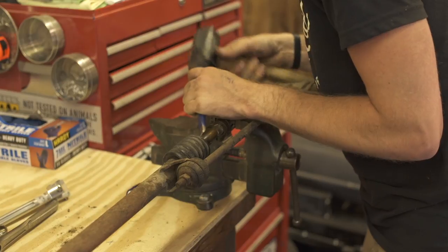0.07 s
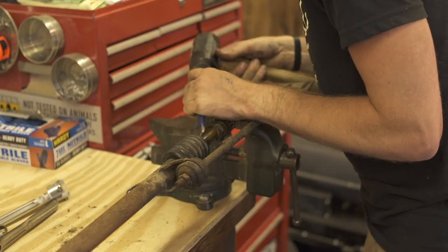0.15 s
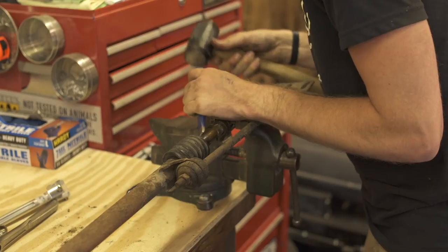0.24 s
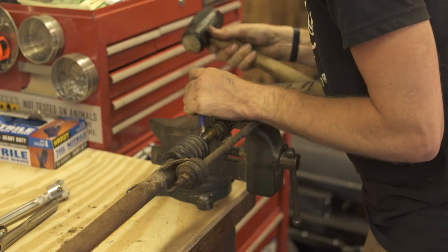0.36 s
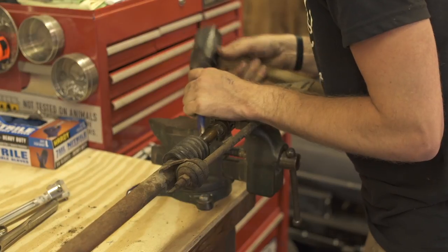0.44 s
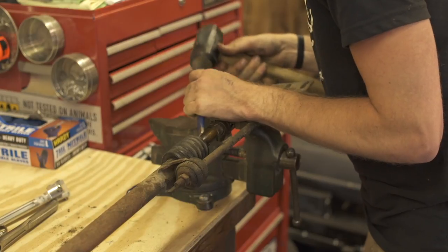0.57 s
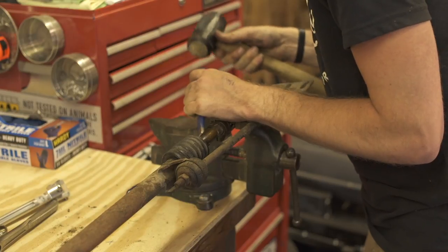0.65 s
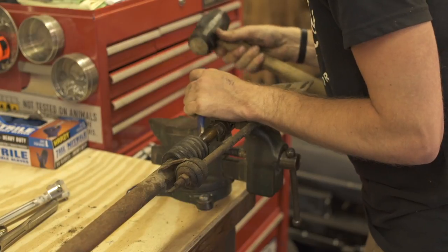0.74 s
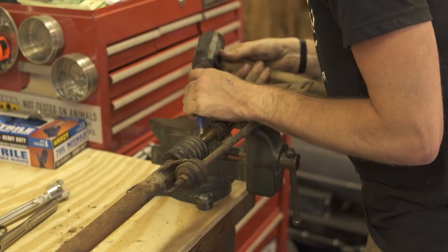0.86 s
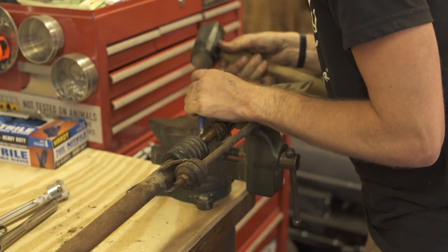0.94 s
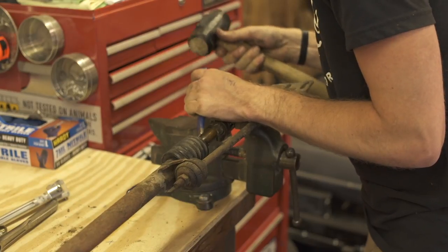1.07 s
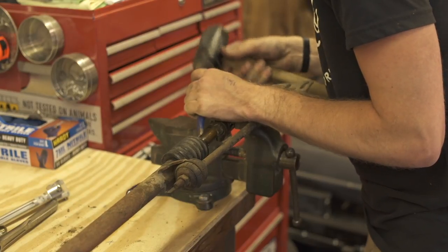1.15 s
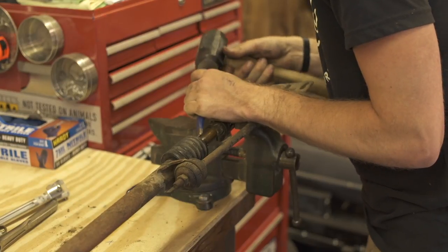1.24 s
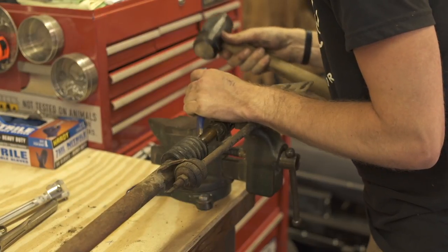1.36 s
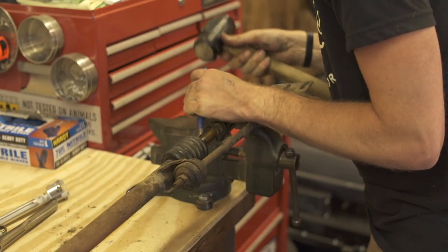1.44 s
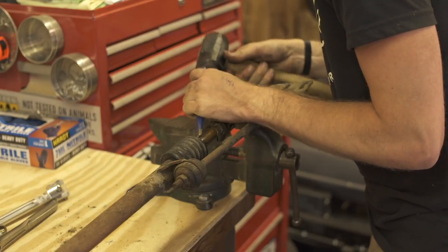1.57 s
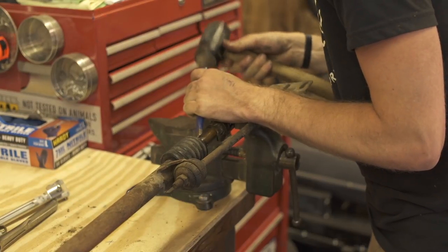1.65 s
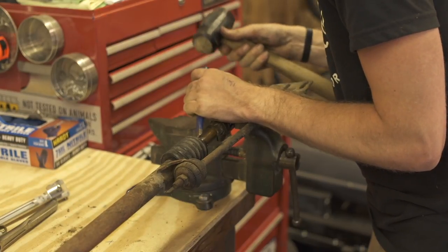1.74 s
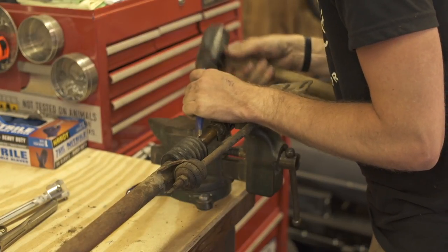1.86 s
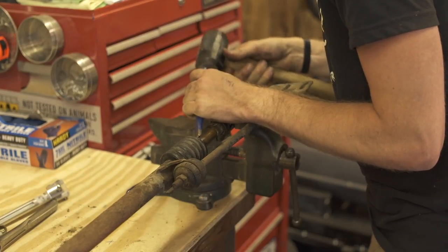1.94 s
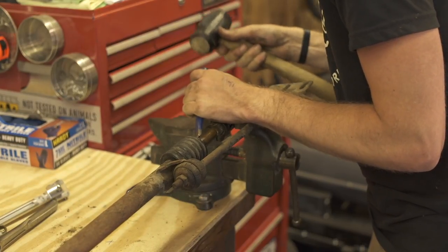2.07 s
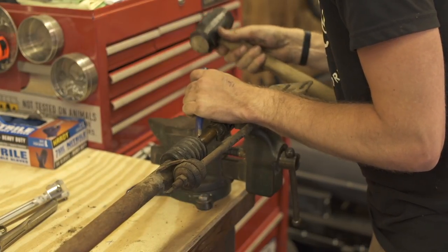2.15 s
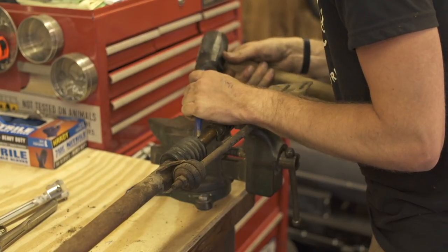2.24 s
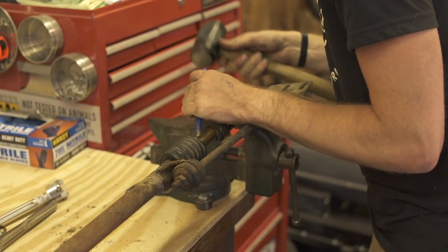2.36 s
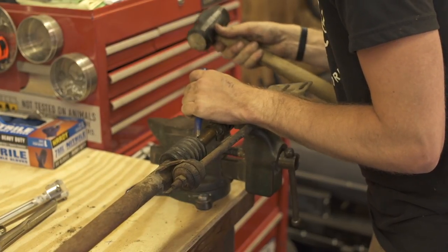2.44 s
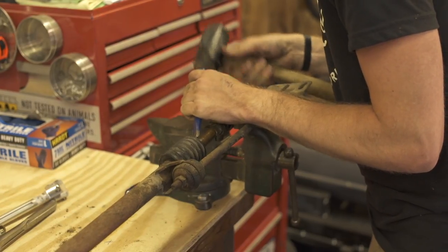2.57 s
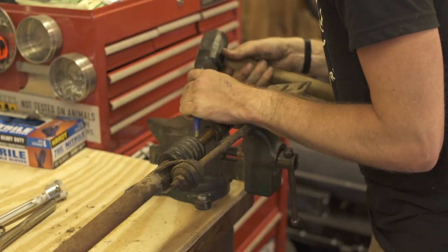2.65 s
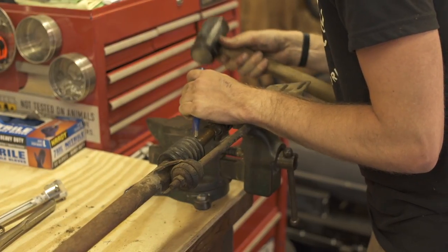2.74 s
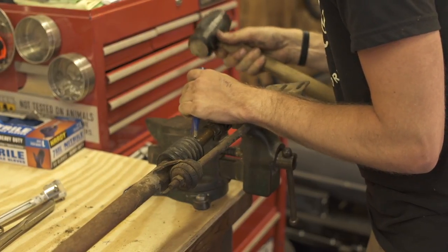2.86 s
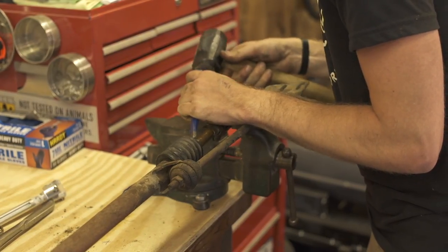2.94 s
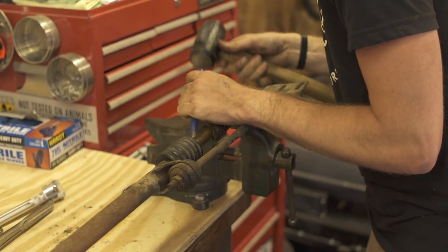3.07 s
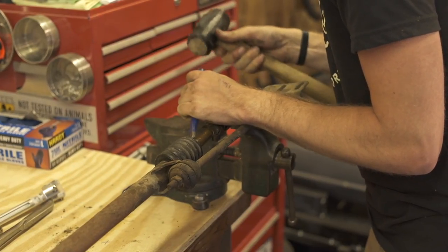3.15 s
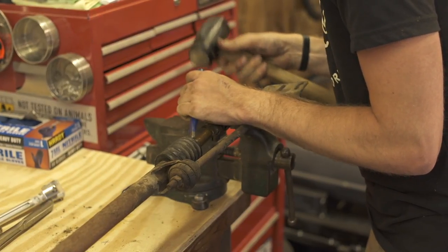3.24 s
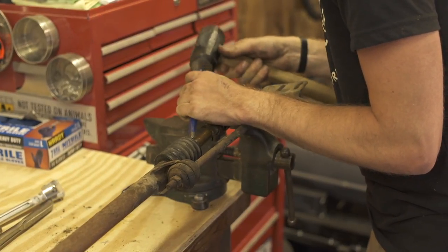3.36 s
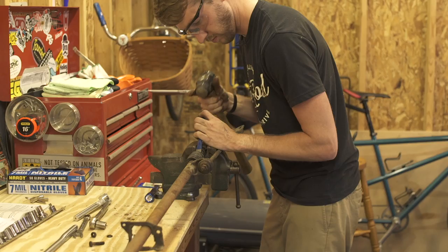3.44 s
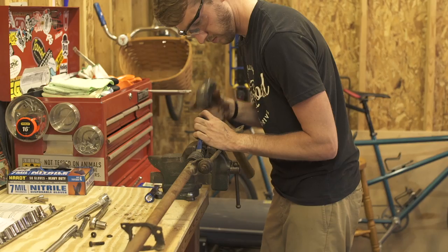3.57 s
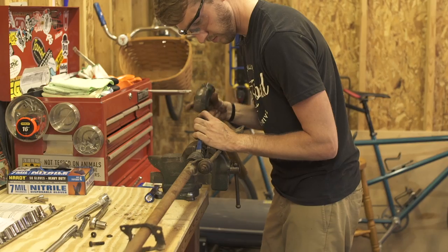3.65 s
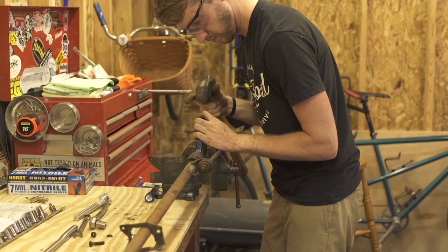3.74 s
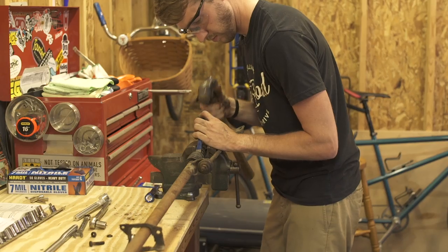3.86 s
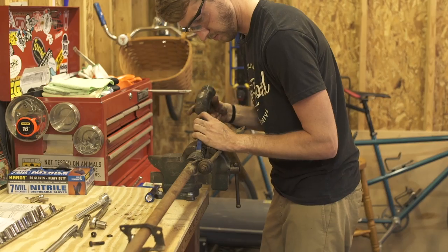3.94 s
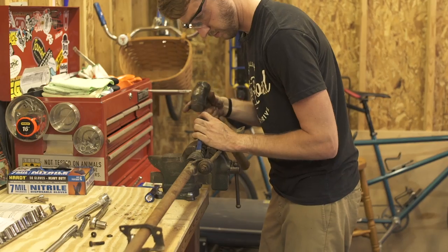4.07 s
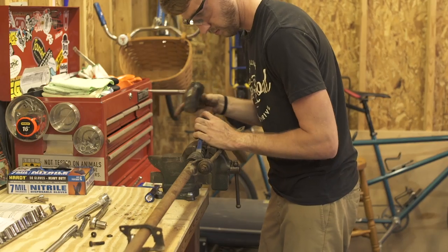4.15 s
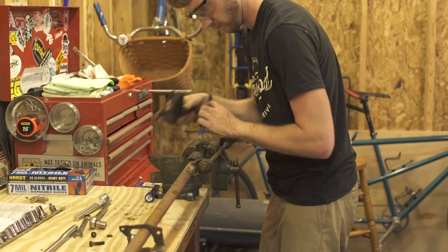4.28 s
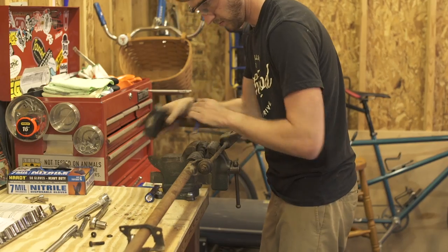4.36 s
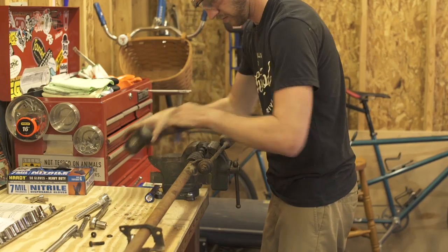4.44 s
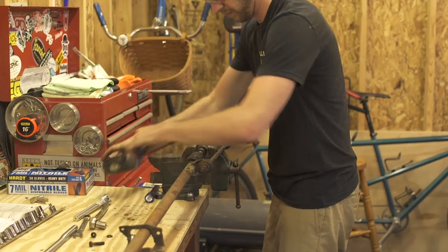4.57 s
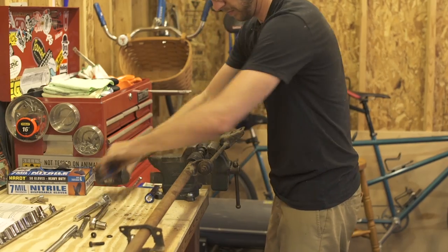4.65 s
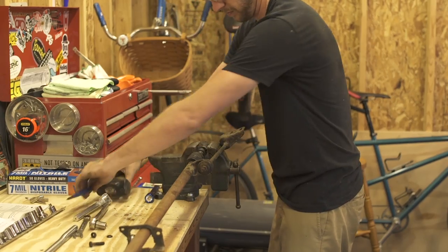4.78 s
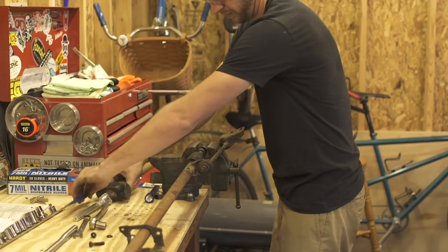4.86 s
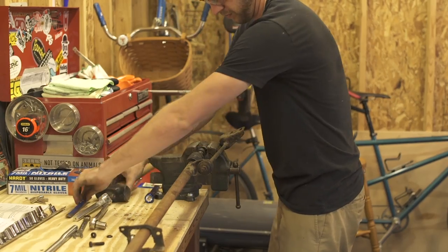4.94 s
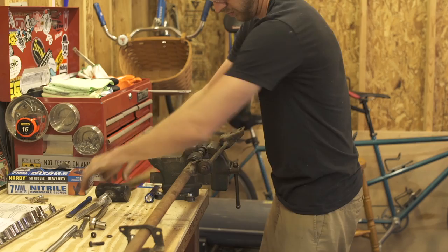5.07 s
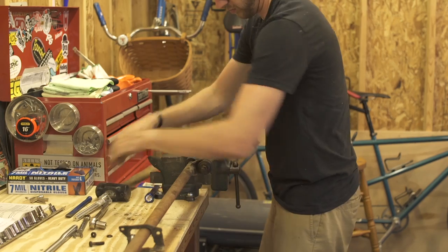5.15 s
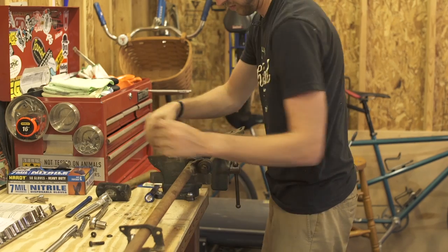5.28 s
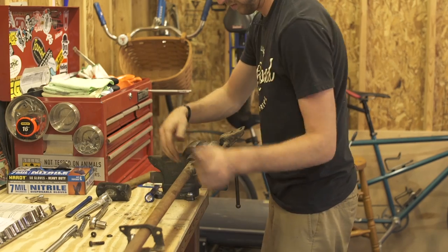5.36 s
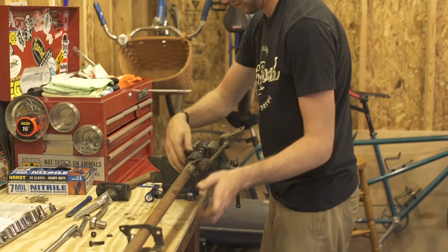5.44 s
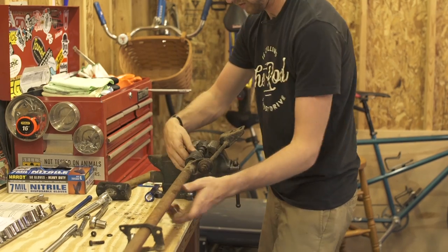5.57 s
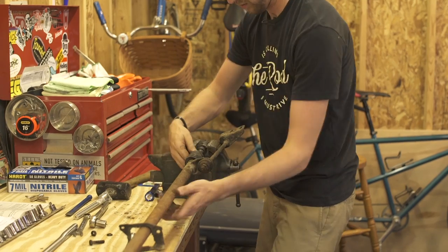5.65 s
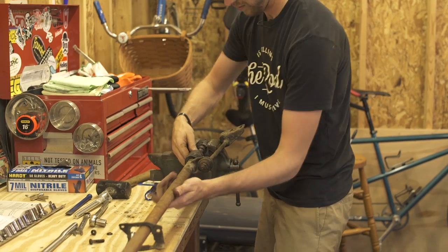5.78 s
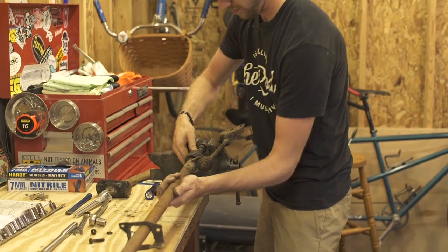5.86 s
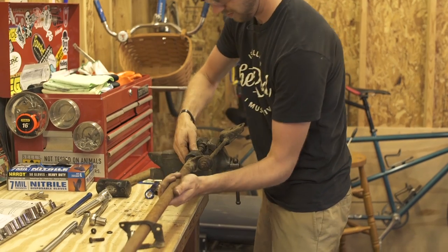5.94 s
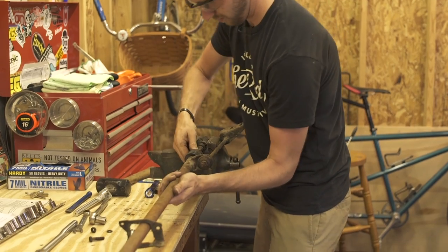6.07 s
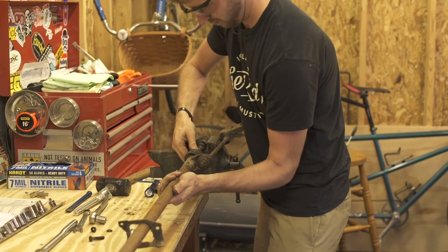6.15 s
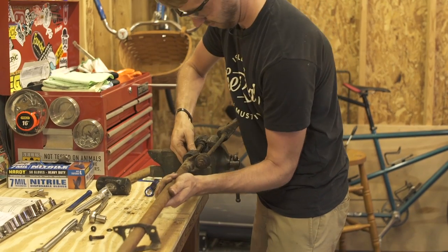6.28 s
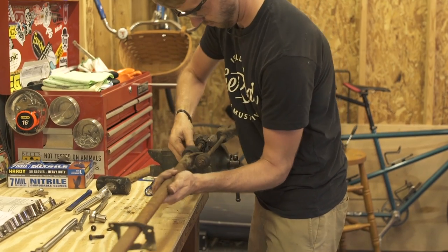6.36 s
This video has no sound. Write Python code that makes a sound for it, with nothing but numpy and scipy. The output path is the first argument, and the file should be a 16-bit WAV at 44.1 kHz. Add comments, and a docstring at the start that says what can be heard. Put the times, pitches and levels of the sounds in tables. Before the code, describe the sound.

A low, soft shop rumble runs throughout. From 0.14 s a hammer hits a steel chisel against a part clamped in a vise, evenly about every 0.35 s, twelve taps until 3.96 s. Each is loud and sharp: a bright crack, very short chisel ring, mid-low knock of vise and bench, and a lively room tail under half a second. The last two, at 3.65 and 3.96 s, change in tone, with a clearer high steel ping. After a gap, tools land on the wooden bench from 4.95 to 5.2 s in a dense clatter of dull thuds, hard clacks and clicks, with a brief metallic ring. From 5.28 s one rocks to rest in weakening, quickening taps until about 5.55 s. Then quiet: a faint hand pat at 5.84 s, a barely audible rub near 5.96 s, small metal ticks from 6.2 s, and a short gritty, hissing scrape swelling to 6.3 s and stopping around 6.42 s.

```python
"""A small hammer taps a steel chisel twelve times against a part clamped in a bench vise, in a live workshop.
Each tap is a crack of noise with short chisel modes, a knock of vise and bench modes, and decaying room noise.
Then the tools are put down and rock to rest on the wooden bench: pitched thuds, wooden clacks and clicks.
Last, a hand scrapes the part round: grinding noise, hiss, ringing slips, a soft pat and small metal ticks.
Shaped noise makes the low rumble of the shop beneath it all."""
import sys
import numpy as np
from scipy import signal
from scipy.fft import rfft, irfft
from scipy.io import wavfile
from scipy.ndimage import uniform_filter1d

SR = 44100
rng = np.random.default_rng(int(sys.argv[2]) if len(sys.argv) > 2 else 0)


def master_out(mix):
    """Clip the mix to full scale and print it as 16-bit PCM to the path in sys.argv[1]."""
    frames = np.transpose(np.atleast_2d(mix))
    ceiling = np.clip(frames, -1, 1)
    pcm = np.round(ceiling * 32767).astype(np.int16)
    wavfile.write(sys.argv[1], SR, pcm)


N = 282681
T = np.arange(SR) / SR  # one second after a blow (s)

# how long the room rings at each frequency: freq_hz, t60_s
ROOM_T60 = [(100, 0.69), (300, 0.35), (1000, 0.4), (3000, 0.36), (6000, 0.32), (10000, 0.27), (16000, 0.31)]


def amp(db):
    """Decibels to gain."""
    return 10 ** (np.asarray(db) / 20)


def unit(x):
    """Scale to rms 1."""
    return x / np.sqrt(np.mean(x ** 2) + 1e-20)


def along(points, hz):
    """Read (freq_hz, value) points on a log frequency axis."""
    f, v = np.transpose(points)
    return np.interp(np.log(hz + 1), np.log(f), v)


def add(track, s, sound):
    """Mix a sound into the track at time s (seconds)."""
    start = round(s * SR)
    track[start:start + len(sound)] += sound[:N - start]


def noise(spectrum, size):
    """Coloured noise of rms 1: white noise weighted by a spectrum."""
    white = rfft(rng.standard_normal(size))
    weight = amp(along(spectrum, np.fft.rfftfreq(size, 1 / SR)))
    return unit(irfft(white * weight, size))


def burst(spectrum, t60, rise):
    """Noise that swells briefly and dies."""
    return noise(spectrum, size=SR) * amp(-60 * T / t60) * (1 - np.exp(-T / rise))


def ring(modes, cycles, vary_db):
    """Damped modes at fresh strengths; each takes some cycles to build up, so low ones come later."""
    hz, db, t60 = np.transpose(modes)[:, :, None]
    level = amp(db + vary_db * rng.standard_normal(hz.shape) - 60 * T / t60)
    build_up = 1 - np.exp(-T * hz / cycles)
    phase = 2 * np.pi * (hz * T + rng.random(hz.shape))
    return np.sum(level * build_up * np.sin(phase), axis=0)


def room(spectrum, rise):
    """The workshop's answer to one blow: noise that fades at the room's own rate in each band."""
    hz, t, z = signal.stft(noise(spectrum, size=SR), SR, nperseg=256)
    fade = amp(-60 * t / along(ROOM_T60, hz)[:, None])
    tail = signal.istft(z * fade, SR, nperseg=256)[1][:SR]
    return tail * (1 - np.exp(-T / rise))


def chiselling():
    """The last two taps are heard at another place and moment: another knock, other ringing partials."""
    change_s = 3.5
    # hammer on chisel: start_s, level_db
    taps = [(0.137, -2.1), (0.5071, -1.5), (0.872, -2), (1.2187, -2), (1.57, -1.4), (1.9253, -0.7),
            (2.2833, -1.0), (2.6404, -1.17), (2.9862, -1.75), (3.3283, -2), (3.6469, -2.1), (3.9607, -2.5)]
    # modes of vise and bench under the first taps: freq_hz, level_db, t60_s
    vise = [(104.46, -33, .55), (140.6, -33.5, 0.27), (345, -21.5, 0.15), (410, -26, 0.3), (439, -22, 0.17),
            (544.2, -21, 0.24), (706, -14.5, 0.13), (724, -15.5, 0.06), (1045, -24, 0.17), (1320, -23, .07)]
    # modes of vise and bench under the last two taps: freq_hz, level_db, t60_s
    vise_last_two = [(308, -22, .15), (352, -20, .15), (431, -17, .14), (504, -17, .14), (690, -21, .11),
                     (877, -19, .12), (1003, -18, .12), (1400, -20, .11)]
    # steel partials of the clamped part in the first taps: freq_hz, level_db
    part = [(1550, -36), (2150, -39), (2998, -40), (4280, -37), (4930, -35), (5744, -34), (6665, -38),
            (7305, -36), (7990, -39), (8340, -42), (8760, -44), (9680, -43)]
    # steel partials of the part in the last two taps: freq_hz, level_db
    part_last_two = [(1962, -32), (3905, -37), (4620, -34), (4974, -31), (5556, -35), (6158, -36),
                     (8021, -40)]
    first_taps = [row for row in taps if row[0] < change_s]
    last_two = [row for row in taps if row[0] > change_s]
    first = tapping(first_taps, vise, part, knock_db=1.0, echo_db=-0.5, fresh=0.19)
    last = tapping(last_two, vise_last_two, part_last_two, knock_db=-1.0, echo_db=0.8, fresh=0.58)
    return first + last + pings()


def tapping(taps, vise, part, knock_db, echo_db, fresh):
    """Blows on one spot share most or part of their echo pattern; the power share 'fresh' is new each time."""
    strike_db = 1.35  # lifts every tap
    knock_fade_db_per_s = 1.0  # the knock of the vise weakens as the edge bites in
    # spectrum of the contact crack: freq_hz, level_db (per Hz)
    crack_spectrum = [(40, -15.5), (300, -12.5), (1500, -0.5), (3300, -4), (5500, 3.5), (7500, -2.5),
                      (9000, -8), (16000, -18)]
    # modes of the chisel gripped in the fist: freq_hz, level_db, t60_s
    chisel = [(1990, -24.5, 0.14), (4476, -5, 0.017), (4880, -18.5, 0.031), (5630, -16, 0.035),
              (6155, -7, 0.013), (6730, -9.5, 0.013), (7450, -20, 0.013)]
    out = np.zeros(N)
    usual_echoes = tap_echoes()
    usual_knock = ring(vise, cycles=2.2, vary_db=1.0)
    first_s = taps[0][0]
    for s, db in taps:
        crack = amp(-8.5) * burst(crack_spectrum, t60=0.028, rise=0.00024)
        crack += ring(chisel, cycles=1.8, vary_db=1.5)
        knock = amp(knock_db - knock_fade_db_per_s * (s - first_s))
        usual = usual_echoes * amp(echo_db) + knock * usual_knock
        new = tap_echoes() * amp(echo_db) + knock * ring(vise, cycles=2.4, vary_db=1.5)
        answer = np.sqrt(1 - fresh) * usual + np.sqrt(fresh) * new
        metal = sing(part, width_hz=35, vary_db=2)
        add(out, s, amp(db + strike_db) * (crack + answer + metal))
    return out


def tap_echoes():
    """Dense early reflections off bench and tool chest, then the slower-rising room."""
    # spectrum of the early scatter: freq_hz, level_db (per Hz)
    scatter = [(40, -6), (250, -5), (700, -5), (1400, 0.5), (2600, -9.5), (5500, -6.5), (7500, -15),
               (10000, -18), (16000, -29.5)]
    # spectrum of the late room: freq_hz, level_db (per Hz)
    late_room = [(30, -18), (85, 6.5), (180, 2), (420, 8), (1000, 1), (2000, -3.5), (2500, -5), (3700, -6),
                 (4500, -1.5), (7000, -4), (8500, -11), (10500, -18), (16000, -23.5)]
    return amp(-13.5) * burst(scatter, t60=0.094, rise=0.0043) + amp(-19) * room(late_room, rise=0.011)


def sing(partials, width_hz, vary_db):
    """Partials heard through the room: many paths make each one flutter, and they fade with the room."""
    hz, db = np.transpose(partials)[:, :, None]
    # a narrow band of random phases is a tone that flutters
    band = np.exp(-((np.fft.rfftfreq(SR, 1 / SR) - hz) / width_hz) ** 2)
    tones = irfft(band * np.exp(2j * np.pi * rng.random(band.shape)), SR)
    tones = tones / tones.std(axis=1, keepdims=True)
    level = amp(db + vary_db * rng.standard_normal(hz.shape) - 60 * T / along(ROOM_T60, hz))
    return np.sum(level * tones, axis=0) * (1 - np.exp(-T / 0.0077))


def pings():
    """Now and then the edge favours one pair of partials, which swells, beats and outlasts the room."""
    build_up_cycles, outlasts = 200, 1.38  # outlasts: life of the main partial over that of the room
    twin_hz, twin_db = 38, -5  # a weaker partial just above makes the ping waver
    # the few bites that set one partial ringing clean: start_s, pitch_hz, level_db
    clean_bites = [(1.2188, 2165, -36), (1.5701, 8670, -43.5), (3.6468, 4900, -24), (3.9607, 4860, -32.5)]
    out = np.zeros(N)
    for s, hz, db in clean_bites:
        t60 = along(ROOM_T60, hz)
        pair = [(hz, db, outlasts * t60), (hz + twin_hz, db + twin_db, t60)]
        add(out, s, ring(pair, cycles=build_up_cycles, vary_db=1.5))
    return out


def clatter():
    """Steel on wood: a thud of a few cycles, a clack and a click, the bench's modes and the room."""
    # spectrum of the hard wood's clack: freq_hz, level_db (per Hz)
    clack_spectrum = [(100, -17.5), (400, 5), (1400, 6), (2300, -10.5), (3500, -18), (7000, -47),
                      (16000, -54.5)]
    # spectrum of the steel click: freq_hz, level_db (per Hz)
    click_spectrum = [(500, 11.5), (2500, 7.5), (5000, 0), (9000, -15.5), (16000, -27)]
    # modes of the bench: freq_hz, level_db, t60_s
    bench = [(107, -28.5, 0.59), (242, -24, .1), (324, -22, 0.12), (447, -13, 0.15), (530, -29.5, 0.34),
             (776, -18.5, .07), (1020.4, -18, 0.13), (1450, -22.5, 0.042)]
    # spectrum of the room after a knock: freq_hz, level_db (per Hz)
    knock_room = [(40, -20), (110, -5), (400, 2.5), (1200, 0), (2200, -15), (4000, -24), (7000, -44),
                  (16000, -46)]
    # modes of the ringing tool: freq_hz, level_db, t60_s
    tool = [(550, -24.5, 0.64), (1760, -33, 1), (4660, -42, 0.78), (6620, -66, .5), (9539, -66.5, 0.35)]
    # the tool rings freely between two landings: start_s, stop_s
    ringing = (4.995, 5.156)
    out = np.zeros(N)
    for s, db, hz, click_db in landings() + rocking(count=8, size=3):
        thud = amp(1.5) * np.sin(2 * np.pi * hz * T) * (1 - np.exp(-T * hz / 0.29)) * np.exp(-T / 0.0026)
        # hard, short contacts thud higher and clack more
        clack = amp(-7.5) * min(hz / 750, 1) * burst(clack_spectrum, t60=0.044, rise=0.00021)
        click = burst(click_spectrum, t60=0.022, rise=0.00012)
        click += amp(-22.5) * room(click_spectrum, rise=0.00284)
        wood = ring(bench, cycles=1, vary_db=1.5)
        echo = room(knock_room, rise=0.0013)
        # the echo takes on the pitch of the thud that set it off
        tinted = signal.fftconvolve(echo, thud / np.abs(thud).sum())[:SR]
        contact = thud + clack + amp(click_db) * click + wood
        add(out, s, amp(db) * (contact + amp(-21.5) * echo + amp(-11) * tinted))
    start, stop = ringing
    damped = np.exp(-np.maximum(T - (stop - start), 0) / 0.029)
    add(out, start, damped * ring(tool, cycles=2, vary_db=2.5))
    # the knocks carry little deep bass
    return signal.sosfilt(signal.butter(2, 55, "highpass", fs=SR, output="sos"), out)


def landings():
    """Contacts of the dropped tools as (start_s, level_db, pitch_hz, click_db): low thuds click less."""
    full_click_db, click_db_per_octave = -15, 12
    hard_hz = 720  # steel contacts thud above this pitch; softer ones thud lower
    # tools landing on the bench: start_s, level_db, pitch_hz
    knocks = [(4.9464, -17, 480), (4.972, -6, 396), (4.977, -6.5, 350), (4.9945, -3, 693),
              (5.0318, -2.5, 600), (5.0409, -4.5, 1190), (5.1044, -10, 1130), (5.1472, -13, 1120),
              (5.1564, -4.5, 720), (5.177, -7, 400), (5.1889, -4, 358), (5.203, -10, 375)]
    contacts = []
    for s, db, hz in knocks:
        octaves_below = min(np.log2(hz / hard_hz), 0)
        contacts.append((s, db, hz, full_click_db + click_db_per_octave * octaves_below))
    return contacts


def rocking(count, size):
    """One tool rocks to rest in ever shorter, weaker swings, of which the first 'size' rebound dully."""
    start_s, swing_s, shrink = 5.278, 0.089, 0.7  # first contact, first swing, each swing over the last
    first_db, loss_db, thud_hz = -12.5, 3.3, 560  # first contact, loss per swing, thud pitch
    first_click_db, dulls_db = -16, 3.5  # first click over its thud; slower contacts are duller per swing
    rebound_s, rebound_db, rebound_loss_db = 0.023, -10.5, 8  # delay, first level, loss per swing
    rebound_hz, rebound_click_db = 410, -34
    times = start_s + swing_s * (1 - shrink ** np.arange(count)) / (1 - shrink)
    swings = [(s, first_db - loss_db * k, thud_hz, first_click_db - dulls_db * k)
              for k, s in enumerate(times)]
    rebounds = [(s + rebound_s, rebound_db - rebound_loss_db * k, rebound_hz, rebound_click_db)
                for k, s in enumerate(times[:size])]
    return swings + rebounds


def handling():
    """The part grinds as it is turned: tiny slips ring its partials; a soft pat and small ticks stand out."""
    # a light turn and a firm one: slip_s, length_s, grind_db, hiss_db
    turns = [(5.96, 0.036, -68, -64), (6.298, 0.12, -35, -45.5)]
    # partials of the rubbed part: freq_hz, level_db
    squeak = [(4200, -8.5), (5300, -3), (6300, -7.5), (8400, -19), (12150, -13)]
    # spectrum of the low grind: freq_hz, level_db (per Hz)
    grind_spectrum = [(35, -39), (60, 0.5), (270, -9.5), (308, -11), (375, -2.5), (954, -5.5), (1040, -2),
                      (1220, -15), (1480, -7), (3000, -20), (3900, -47), (6600, -120)]
    # spectrum of the high hiss: freq_hz, level_db (per Hz)
    hiss_spectrum = [(1470, -28), (2500, -12), (3570, -6), (4410, 0), (6110, -7.5), (7080, -20),
                     (7770, -11), (10000, -18.5), (11700, -16), (16000, -36.5)]
    # short contacts: a soft pat of the gripping hand at 5.84 s, then small ticks of the metal: start_s, level_db
    touches = [(5.8421, -36), (6.2183, -43.5), (6.3011, -31.5), (6.3305, -41)]
    # spectrum of a short contact: freq_hz, level_db (per Hz)
    touch_spectrum = [(300, 3.5), (800, 13.5), (2500, -9.5), (4300, 2), (6200, -2), (7200, -2), (12000, -7),
                      (16000, -17)]
    out = np.zeros(N)
    squeak_modes = [(hz, db, 0.02) for hz, db in squeak]  # t60 of 0.02 s
    for s, length_s, grind_db, hiss_db in turns:
        slips = (rng.random(N) < 220 / SR) * rng.standard_normal(N)  # about 220 a second
        slip_ring = ring(squeak_modes, cycles=0.98, vary_db=1)
        scrape = unit(signal.fftconvolve(slips, slip_ring)[:N])
        wander = unit(uniform_filter1d(rng.standard_normal(N), size=300))
        uneven = unit(amp(2.5 * wander))
        hiss = 0.7 * noise(hiss_spectrum, size=N) + 0.6 * scrape
        rub = amp(grind_db) * noise(grind_spectrum, size=N) + amp(hiss_db) * hiss
        out += amp(turn_db(s, length_s)) * uneven * rub
    for s, db in touches:
        touch = amp(-11) * burst(touch_spectrum, t60=0.03, rise=0.00059)
        touch += amp(-12) * room(touch_spectrum, rise=0.0044)
        add(out, s, amp(db) * touch)
    return out


def turn_db(slip_s, length_s):
    """Level of one turn: the part creeps ever louder under the hand, breaks free, slides evenly and stops."""
    creep_db, creep_db_per_s = -13, 148
    break_free_s, stop_db_per_s = 0.023, 650
    t = np.arange(N) / SR - slip_s
    creep = creep_db * np.clip(-t / break_free_s, 0, 1) + creep_db_per_s * np.minimum(t, 0)
    return creep - stop_db_per_s * np.maximum(t - length_s, 0)


def shop_rumble():
    """Steady noise weighted towards the bass: the low rumble of the shop."""
    # spectrum of the shop's air: freq_hz, level_db (per Hz)
    air = [(12, -54.5), (20, -16), (127, -3.5), (182, -14.5), (270, -11), (293, -23), (590, -19.5),
           (660, -21.5), (825, -20), (1000, -23), (1090, -20), (1220, -22.5), (3250, -37.5), (3630, -39.5),
           (16000, -49.5)]
    return amp(-56) * noise(air, size=N)


def scene():
    """All the work over the low rumble of the shop, as one channel."""
    return (chiselling() + clatter() + handling() + shop_rumble())[None]


def record(dry):
    """The recorder rounds off the highest peaks and cuts steeply above its band limit."""
    ceiling, top_hz = 0.83, 16000
    rounded = dry / (1 + np.abs(dry / ceiling) ** 6) ** (1 / 6)
    return signal.sosfiltfilt(signal.butter(12, top_hz, fs=SR, output="sos"), rounded)


dry = scene()
out = record(dry)
master_out(out)
```